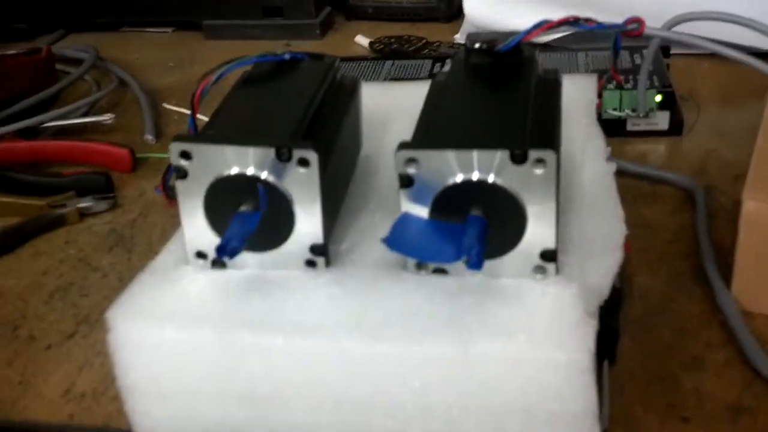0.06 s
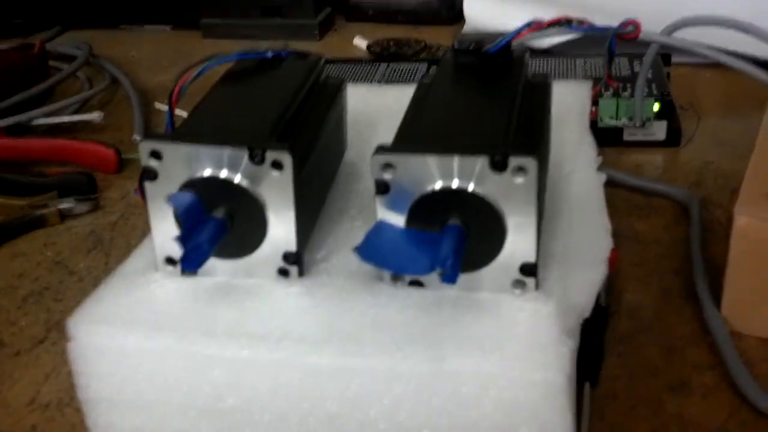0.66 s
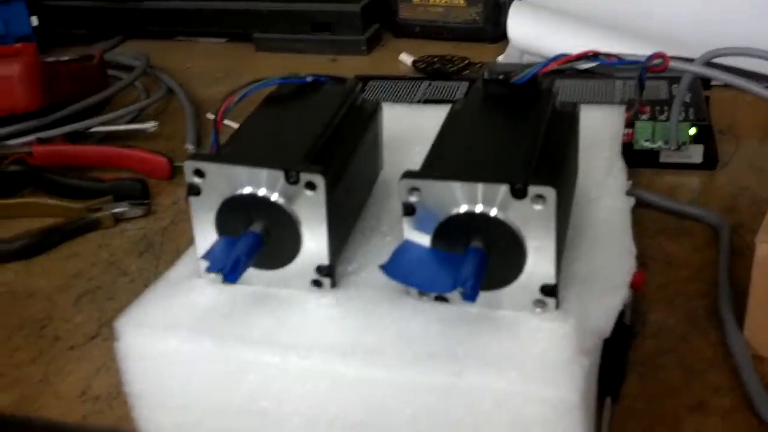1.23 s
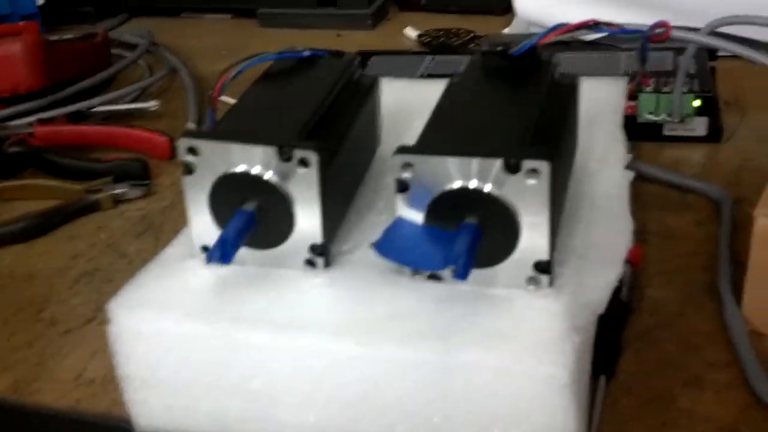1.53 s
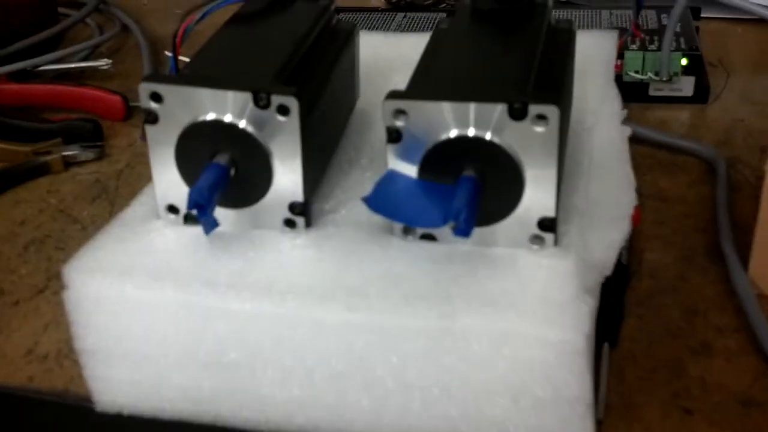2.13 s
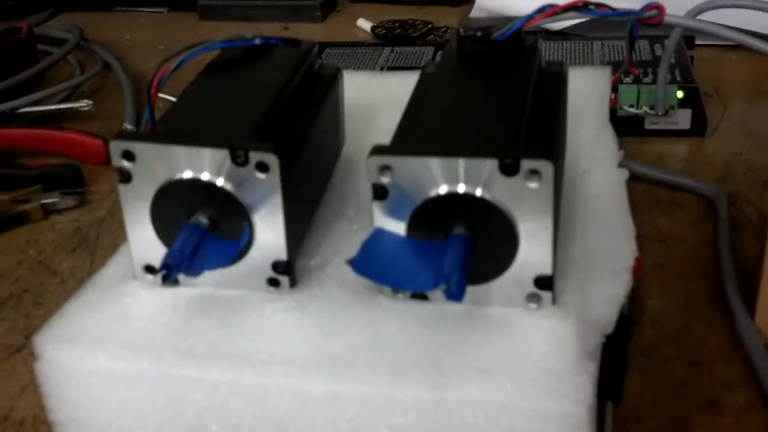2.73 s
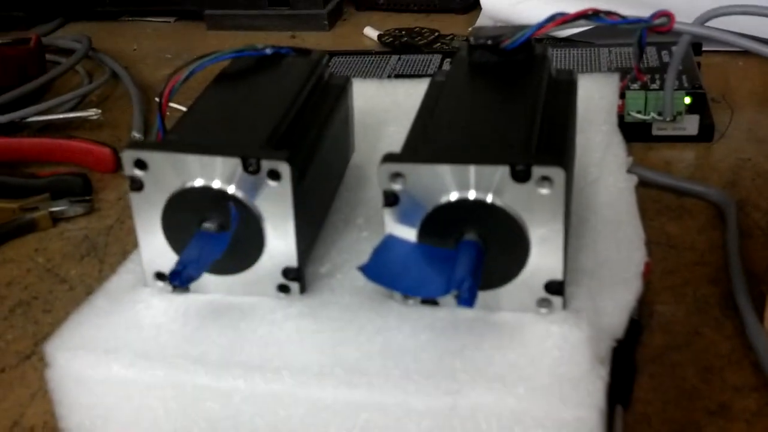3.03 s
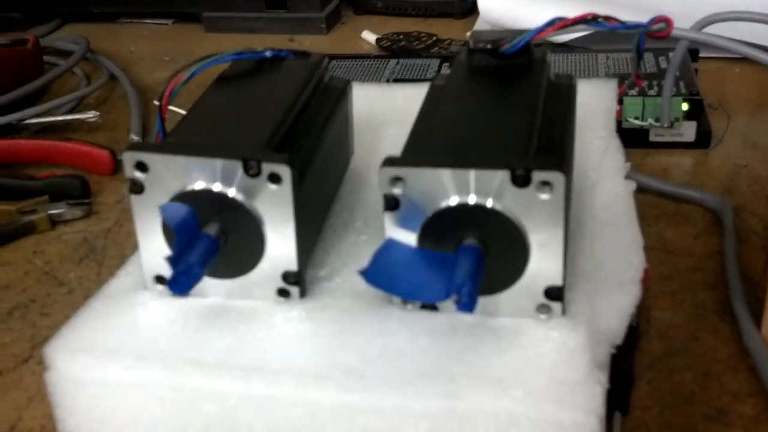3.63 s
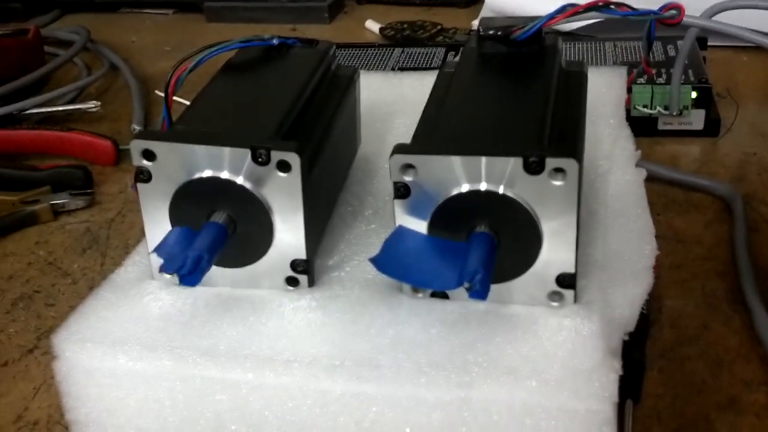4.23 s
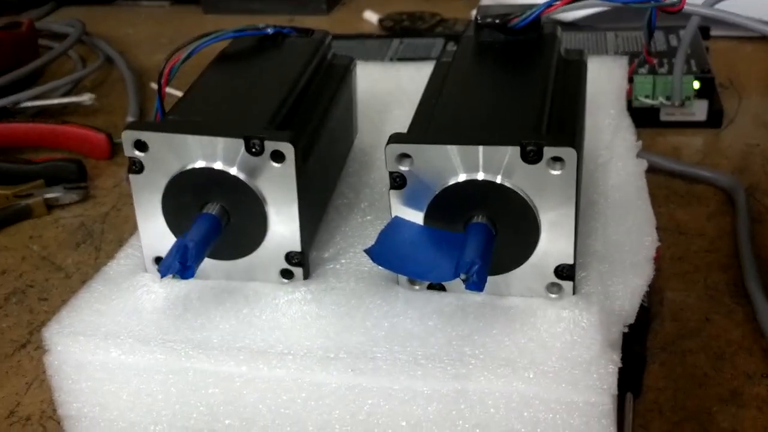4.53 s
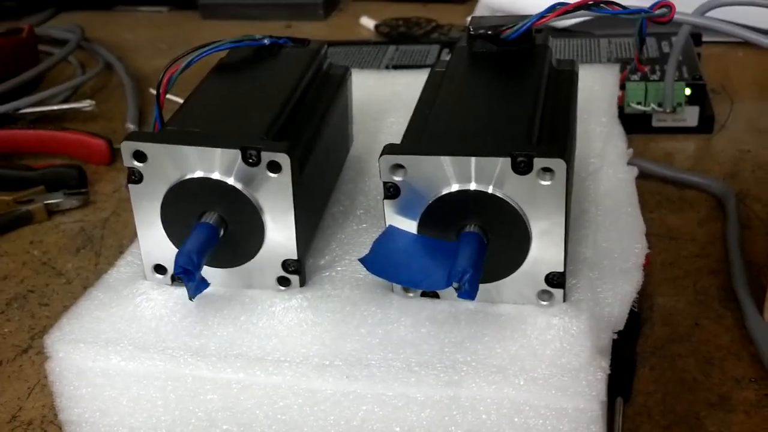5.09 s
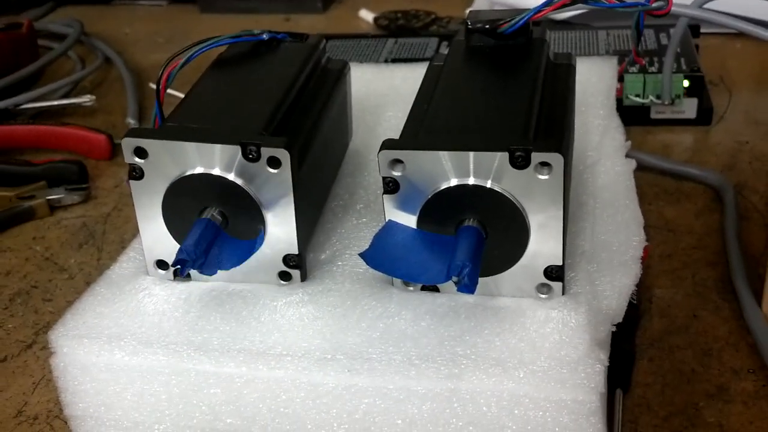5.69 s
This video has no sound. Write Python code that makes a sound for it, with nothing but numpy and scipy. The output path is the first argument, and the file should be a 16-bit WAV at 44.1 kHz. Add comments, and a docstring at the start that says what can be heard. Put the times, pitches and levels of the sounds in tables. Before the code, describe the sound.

A stepper motor turns slowly on a workbench, giving a steady pitched hum with a raspy buzz and a high sizzle, while a fan whirrs softly nearby. In the first two seconds, fingers bump, rub and squeak on the hand-held camera. Afterwards a tape flag on the shaft brushes a foam block and flicks free with a crisp tick, twice, about three seconds apart. The microphone is close.

```python
"""A stepper motor hums and buzzes through slow quarter steps, on a foam block close to a hand-held camera.
A second motor beside it holds still under a thin driver whine that sinks away. A fan runs nearby.
Early on, the hand bumps, rubs and squeaks on the camera shell.
Once a turn, a tape flag on the turning shaft brushes the foam and flicks free above the workbench."""
import sys
import numpy as np
from scipy import signal
from scipy.fft import rfft, irfft
from scipy.io import wavfile

SR = 44100
rng = np.random.default_rng(int(sys.argv[2]) if len(sys.argv) > 2 else 0)


def put_to_file(sound):
    """Save the sound as 16-bit audio at rate SR, in the file named by the first command-line argument."""
    columns = np.atleast_2d(sound).T  # one column per channel
    safe = np.clip(columns, -1, 1)
    whole_steps = np.round(safe * 32767)
    wavfile.write(sys.argv[1], SR, whole_steps.astype(np.int16))


N = 253575
TIME = np.arange(N) / SR
FREQ = np.arange(N // 2 + 1) * SR / N
STEP_HZ, CYCLE_STEPS = 262.507, 16  # step rate; steps in one cycle of the coil current
RASP_LAG_STEPS = .55  # rasp and rattle land this far into each step


def undb(db):
    """Decibels to gain."""
    return 10 ** (np.asarray(db) / 20)


def unit(x):
    """Scale to an rms of one."""
    return x / np.sqrt(np.mean(x ** 2))


def noise():
    """Two unrelated white noises."""
    return rng.standard_normal((2, N))


def drift(rate_hz):
    """Smooth random wander, rms one."""
    return unit(irfft(rfft(rng.standard_normal(N)) / (1 + (FREQ / rate_hz) ** 4), N))


def ramp(start_s, length_s):
    """A straight rise from zero to one."""
    return np.clip((TIME - start_s) / length_s, 0, 1)


def decay(start_s, t60_s):
    """Instant attack, exponential tail."""
    return (TIME >= start_s) * np.exp(-np.log(1000) * np.maximum(TIME - start_s, 0) / t60_s)


def colour(x, eq):
    """Shape x with an EQ curve, then scale to an rms of one."""
    hz, db = np.transpose(eq)
    return unit(irfft(rfft(x) * undb(np.interp(np.log(FREQ + 1), np.log(hz), db)), N))


def tones(base, partials, waver_db):
    """Sines at multiples of a base, each wavering in level, with its own phase on each side."""
    out = 0
    for multiple, db in partials:
        phase = 2 * np.pi * (multiple * base * TIME + rng.random((2, 1)))
        out = out + np.sqrt(2) * undb(db + waver_db * drift(11)) * np.sin(phase)
    return out


def spread(pair, comb_hz=2756):
    """The camera's wide stereo: bands take turns between mid and side up the spectrum."""
    angle = np.pi * FREQ / comb_hz
    mid, side = np.abs(np.sin(angle)) ** 1.6, np.abs(np.cos(angle)) ** 3.45
    mid = mid + 0.62 * np.exp(-(np.log((FREQ + 1) / 330) / 0.98) ** 2)  # low mids stay nearer the centre
    mid, side = irfft(rfft(pair) * np.array([mid, side]) / np.hypot(mid, side), N)
    return np.array([mid + side, mid - side])


# The turning motor's hum: step_harmonic, level_db, left_over_right_db, left_lead_rad
HUM_PARTIALS = [(1, -44, 3.5, 1.035), (2, -45, 5, 0.5), (3, -51, 10.5, -2.5), (4, -51, 4, 0.5),
                (5, -56.5, 1, -0.5), (6, -52.5, -3.5, 0.34), (7, -58, -7, -3), (8, -63.5, 3, 0.66),
                (9, -65, 0, -2.5), (10, -71.5, 0, 3.5), (11, -101, -15, -1.5), (12, -83, 8, 2),
                (13, -71.5, -5, 1.95), (14, -80, -17, 6), (15, -83, -11, 0.5), (16, -77, 4, -1)]

def hum():
    """Every quarter step jerks the rotor; the motor body sounds the harmonics of the step rate."""
    shift = ramp(2.16, 0.32)  # the camera shifts once: low tones grow, high ones hardly change
    low_db = np.interp(shift, [0, 1], [-2, -0.56])
    high_db = np.interp(shift, [0, 1], [-0.4, -0.63])
    slip = 0.021 * drift(29)  # the rotor lags a little, differently from step to step
    sides = np.array([[.5], [-.5]])
    out = 0
    for harmonic, db, pan_db, lead in HUM_PARTIALS:
        shift_db = low_db if harmonic <= 2 else high_db
        smear = 0.1207 * harmonic ** 2  # the body spreads each jerk in time
        phase = harmonic * (2 * np.pi * STEP_HZ * TIME + slip) + smear
        level = np.sqrt(2) * undb(db + shift_db + 0.2 * drift(34))
        out = out - level * undb(sides * pan_db) * np.cos(phase + sides * lead)
    return out


# Faint overtones around the hum: coil_harmonic, level_db
UNEVEN_PARTIALS = [(24, -72.5), (28, -66), (36, -68), (40, -68), (84, -71), (92, -74), (95, -69.5),
                   (97, -70), (100, -76.5), (116, -81), (132, -79.5), (215, -102), (225, -83.5),
                   (449, -89.5), (463, -83), (478, -86), (482, -77), (502, -79), (622, -89), (642, -84),
                   (686, -76), (690, -85), (694, -85), (702, -76), (706, -80), (722, -86), (834, -76),
                   (850, -78), (866, -78.5), (870, -77), (878, -93), (882, -83), (886, -77), (902, -79)]

def uneven_steps():
    """Unequal steps repeat with the coil current, adding tones that beat with the hum."""
    return tones(STEP_HZ / CYCLE_STEPS, UNEVEN_PARTIALS, waver_db=-0.6)


# A sharp rasp, its tones cresting together at each step: coil_harmonic, level_db
RASP_PARTIALS = [(207, -79.5), (223, -81), (239, -74.5), (255, -76.5), (271, -79), (287, -81.5),
                 (303, -82.5), (335, -75), (367, -88)]

def rasp():
    """The motor housing rings briefly at each step, its phase turning with the coil current."""
    coil = 2 * np.pi * (STEP_HZ * TIME - RASP_LAG_STEPS) / CYCLE_STEPS
    ring = np.sqrt(2) * sum(undb(db) * np.exp(1j * harmonic * coil) for harmonic, db in RASP_PARTIALS)
    return np.array([ring.real, ring.imag])


def step_noise(width, fresh_db, lag_steps):
    """A noise burst at each step: a pattern that loops with the coil current, plus fresh noise."""
    gate = np.exp((np.cos(2 * np.pi * (STEP_HZ * TIME - lag_steps)) - 1) / width)
    looped = noise()[:, np.arange(N) % (CYCLE_STEPS * round(SR / STEP_HZ))]
    return gate * (looped + undb(fresh_db) * noise())


# The rattle's upper-mid bite: freq_hz, gain_db
RATTLE_EQ = [(1200, -29), (2300, 4.5), (3200, 1.5), (4200, -1), (5200, -10), (7000, -13), (16000, -20)]

def rattle():
    """Each step rattles the motor's laminations."""
    return undb(-67.5) * colour(step_noise(width=.35, fresh_db=-1, lag_steps=RASP_LAG_STEPS), RATTLE_EQ)


def step_ticks(smear_steps, wobble_steps, harmonics=62, size=8192):
    """The same smeared tick at every step, pushed early or late with the coil current."""
    delays = smear_steps * (rng.random((2, harmonics)) - .5)
    tick = irfft(np.exp(2j * np.pi * np.cumsum(delays, axis=1)), size)
    coil = 2 * np.pi * STEP_HZ / CYCLE_STEPS * TIME
    steps = STEP_HZ * TIME + wobble_steps * (np.sin(coil) + np.cos(2 * coil) / 2)
    return unit(tick[:, (steps * size).astype(int) % size])


# The sizzle's bright top: freq_hz, gain_db
SIZZLE_EQ = [(3500, -18), (5500, -3), (6800, 2), (7700, 1.5), (8700, 2.5), (10800, -2), (11450, 5.5),
             (12200, -9), (13200, 3), (14350, 8.5), (15700, 3.5)]
# Thin chopper tones, played 1% below these pitches: nominal_pitch_hz, level_db
CHOPPER_PARTIALS = [(11350, -82), (11613, -83), (13729, -86), (14172, -85), (14433, -84), (14451, -82),
                    (14517, -83), (14730, -81), (14763, -83), (14779, -84), (14994, -86), (15255, -85)]

def chopper():
    """The chopped coil current sizzles; thin tones just off the step harmonics beat with it."""
    fizz = undb(-4) * unit(step_noise(width=1.6, fresh_db=0, lag_steps=0.12))
    ticks = step_ticks(smear_steps=0.75, wobble_steps=.005)
    sizzle = undb(-66.5) * colour(ticks + fizz, SIZZLE_EQ)
    return sizzle + tones(0.99, CHOPPER_PARTIALS, waver_db=0)


def buzz():
    """The turning motor's rasp, rattle and sizzle flicker in level together."""
    return (rasp() + rattle() + chopper()) * undb(0.99 * drift(15))


def whine(start_db=-74, sink_db_per_s=10):
    """The holding motor's driver sings a thin, unsteady tone that slowly fades."""
    pitch_hz = 11590 + 95 * drift(200)
    phase = 2 * np.pi * np.cumsum(pitch_hz) / SR
    return np.sqrt(2) * undb(start_db - sink_db_per_s * TIME) * np.array([np.sin(phase), np.cos(phase)])


# The fan's whirr: shaft_harmonic, level_db
FAN_PARTIALS = [(8, -72.5), (12, -71.5), (13, -68), (14, -68.5), (28, -73.5), (48, -76), (50, -70.5),
                (51, -73.5), (52, -68.5), (54, -79), (56, -68), (58, -79), (60, -87), (64, -102), (66, -74),
                (67, -81), (68, -82.5), (70, -94.5)]

def fan_motor(shaft_hz=47.68):
    """The fan motor sings wavering harmonics of its shaft rate."""
    return tones(shaft_hz, FAN_PARTIALS, waver_db=3)


# A dark bed of air: freq_hz, gain_db
AIR_EQ = [(20, -7), (60, -0.5), (110, 1.5), (160, -5.5), (220, 1), (350, -3.5), (600, -6), (850, -0.5),
          (1200, -8), (1500, -8.5), (1900, -17.5), (3000, -22), (6000, -28), (16000, -28.5)]

def fan_air():
    """Rushing air of the fan, with the room behind it."""
    return undb(-51.5 + .5 * drift(32)) * colour(noise(), AIR_EQ)


def mains(pitch_hz=120):
    """The power supply hums faintly on the right."""
    return np.sqrt(2) * np.array([[-undb(-83.5)], [undb(-62)]]) * np.sin(2 * np.pi * pitch_hz * TIME)


# Finger hits on the camera: start_s, level_db, contact_s, scuff_relative_db, thud_relative_db
BUMP_HITS = [(.5733, -26.5, .00038, -21, -12), (.5792, -32, .00035, -18, -16),
             (.6098, -38, .0003, -20, -25), (.7365, -27.5, .00036, -23, -12),
             (.7379, -28.5, .00028, -19, -20), (.7408, -34, .00028, -15, -12), (1.177, -36, .0004, -24, -5),
             (1.3484, -24, .00026, -22, -19), (1.351, -30, .00026, -18, -19),
             (1.360, -33, .00024, -14, -20), (1.411, -36, .0003, -22, -11),
             (1.609, -31.5, .00026, -15, -20), (1.732, -42, .0005, -22, -5)]
# The shell's hollow ring: pitch_hz, t60_s, level_db
SHELL_MODES = [(480, .028, -12.5), (690, .018, -11.5), (880, .02, -11.5), (1090, .016, -14),
               (1420, .016, -16)]
# The crack of scuffed skin: freq_hz, gain_db
SCUFF_EQ = [(700, -43), (1300, 11), (2000, 3), (2800, -2), (4500, -9.5), (7000, -11), (16000, -21)]

def bumps(thud_start_hz=470, thud_end_hz=160, sag_s=.009, low_cut_hz=135):
    """Fingers knock the shell: a contact pulse, a hollow ring, a scuff and a thud that sags in pitch."""
    out, skin = 0, spread(colour(noise(), SCUFF_EQ))
    pan = undb([[-2.5], [0]])  # knocks lean right
    for start, db, contact, scuff_db, thud_db in BUMP_HITS:
        age = TIME - start
        push = (1 - (age / contact) ** 2) * np.exp(-(age / contact) ** 2 / 2)  # a brief, smooth dent
        ring = sum(undb(mode_db) * decay(start, t60) * np.cos(2 * np.pi * hz * age)
                   for hz, t60, mode_db in SHELL_MODES)
        ring = ring * ramp(start, 4 * contact)  # takes over as the finger leaves
        settled = 1 - np.exp(-np.maximum(age, 0) / sag_s)
        cycles = thud_end_hz * age + (thud_start_hz - thud_end_hz) * sag_s * settled
        thud = decay(start, .085) * np.cos(2 * np.pi * cycles) * np.clip(cycles, 0, 1)  # one-cycle attack
        knock = pan * (push + ring + undb(thud_db) * thud)
        scuff = ramp(start, 0.0011) * decay(start, 0.068) * skin
        out = out + undb(db) * (knock + undb(scuff_db) * scuff)
    low_cut = 1 / np.sqrt(1 + (low_cut_hz / (FREQ + 1)) ** 8)  # the knocks carry no deep bass
    return irfft(rfft(out) * low_cut, N)


# Hand strokes on the camera: peak_s, rise_s, fall_s, scrape_db, grip_muffling_db
HAND_STROKES = [(.60, 0.012, 0.099, -56, 26), (.69, .04, 0.075, -51, 7), (0.79, 0.058, 0.1, -48.5, 18),
                (1.0, 0.14, 0.45, -63.5, -4.5), (1.275, 0.013, 0.14, -55, 2), (1.395, 0.04, 0.09, -48, 5.5),
                (1.635, 0.021, 0.059, -53.5, -0.5), (1.73, 0.03, 0.089, -55.5, 11),
                (1.84, 0.057, 0.14, -55.5, 6)]
# The rub's three layers, shell boom, mid scrape and airy hiss: freq_hz, gain_db
BOOM_EQ = [(60, -44), (200, 3.5), (450, -1), (720, 5), (1150, -1), (1700, -7.5), (4000, -38)]
SCRAPE_EQ = [(700, -62), (1300, 7), (1900, 0.5), (2800, 4.5), (4500, -15), (7000, -22), (16000, -51)]
HISS_EQ = [(2500, 5.5), (5000, 4.5), (7500, 3), (12000, 2.5), (15500, -4)]

def rubbing(boom_db=2, boom_per_grip=0.3, catches_per_s=600):
    """Skin drags over the shell in tiny uneven slips; a firm grip booms, a light one hisses."""
    boom = scrape = hiss = 0
    for peak, rise, fall, db, grip_db in HAND_STROKES:
        age = TIME - peak
        stroke = undb(db) * np.exp(-(np.minimum(age, 0) / rise) ** 2 - np.maximum(age, 0) / fall)
        boom = np.hypot(boom, stroke * undb(boom_db + boom_per_grip * grip_db))
        scrape = np.hypot(scrape, stroke)
        hiss = np.hypot(hiss, stroke * undb(-grip_db))
    out = 0
    for envelope, eq in ((boom, BOOM_EQ), (scrape, SCRAPE_EQ), (hiss, HISS_EQ)):
        grit = unit(noise() * (rng.random(N) < catches_per_s / SR))  # lone catches of the skin
        slips = noise() * undb(2 * drift(110)) + undb(-7.5) * grit
        out = out + envelope * colour(slips, eq)
    return out


# Skin squeaks on the shell: peak_s, half_length_s, pitch_hz, level_db
SKIN_SQUEAKS = [(0.687, 0.053, 7300, -65), (1.02, 0.15, 15200, -60), (1.37, .12, 15000, -65),
                (1.64, 0.045, 2950, -52), (1.642, 0.026, 5300, -56), (1.72, 0.044, 5530, -64),
                (1.84, 0.05, 2350, -57)]

def squeaks():
    """Fast stick and slip narrows the rubbing to a breathy pitch."""
    out, grain = 0, rfft(noise())
    for peak, half_length, hz, db in SKIN_SQUEAKS:
        band = unit(irfft(grain / (1 + ((FREQ / hz - 1) / 0.048) ** 2), N))
        out = out + undb(db) * np.exp(-((TIME - peak) / half_length) ** 2) * band
    return out


def tape_tick(age, pitch_hz=3750, width_s=.00042):
    """The tiny tick of tape snapping free."""
    return np.exp(-(age / width_s) ** 2) * np.cos(2 * np.pi * pitch_hz * age)


# The flag leaving the foam, once a turn: release_s, brush_db, flick_db
FLAG_FLICKS = [(2.4328, -54, -35), (5.4798, -54.5, -37.5)]
# The crisp brush of tape on foam: freq_hz, gain_db
BRUSH_EQ = [(2000, -10), (3100, 8), (4600, 5.5), (7000, 2), (9500, 2), (12000, -3), (15500, -1)]

def tape_flag():
    """The tape grazes the foam, drags over it, then snaps free with a tick that the bench reflects."""
    out, brush = 0, colour(noise(), BRUSH_EQ)
    for release, brush_db, flick_db in FLAG_FLICKS:
        age = TIME - release
        graze = undb(-10) * ramp(release - .07, 0.011)
        drag = np.maximum(graze, ramp(release - .02, 0.0032)) * (1 - ramp(release, 0.0024))
        bench_echo = undb(-16) * tape_tick(age - .004)
        out = out + undb(brush_db) * drag * brush + undb(flick_db) * (tape_tick(age) + bench_echo)
    return spread(out)


def scene():
    """Motors, fan and handling as they reach the camera."""
    overtones = uneven_steps() + fan_motor()
    fade_depth = 1 - ramp(0, 0.59)  # the steady layers fade in, the hum from slightly further down
    motor_hum = undb(-6 * fade_depth) * hum()
    bed = undb(-5 * fade_depth) * (spread(overtones + buzz() + fan_air()) + mains())
    return motor_hum + bed + bumps() + tape_flag() + spread(whine() + rubbing() + squeaks())


def record(dry, low_cut_hz=66, high_cut_hz=15800):
    """The camera cuts the bass and the top."""
    thin = signal.sosfilt(signal.butter(4, low_cut_hz, "high", fs=SR, output="sos"), dry)
    return signal.sosfilt(signal.ellip(10, .1, 80, high_cut_hz, fs=SR, output="sos"), thin)


dry = scene()
out = record(dry)
put_to_file(out)
```